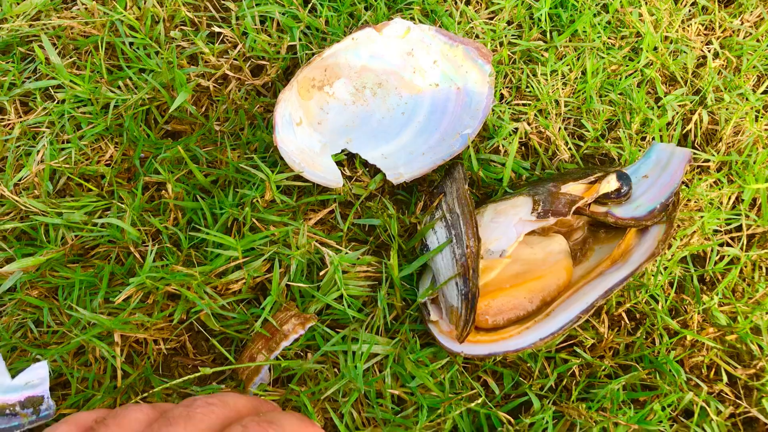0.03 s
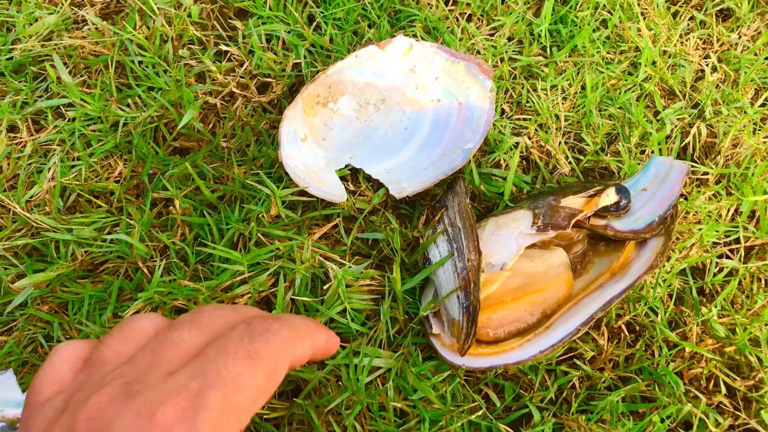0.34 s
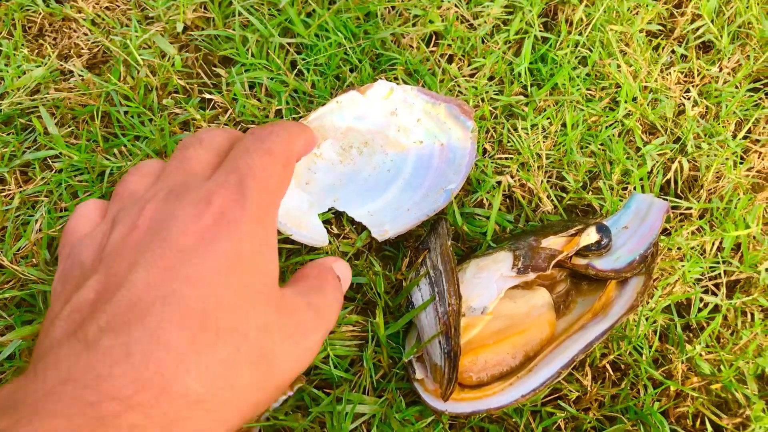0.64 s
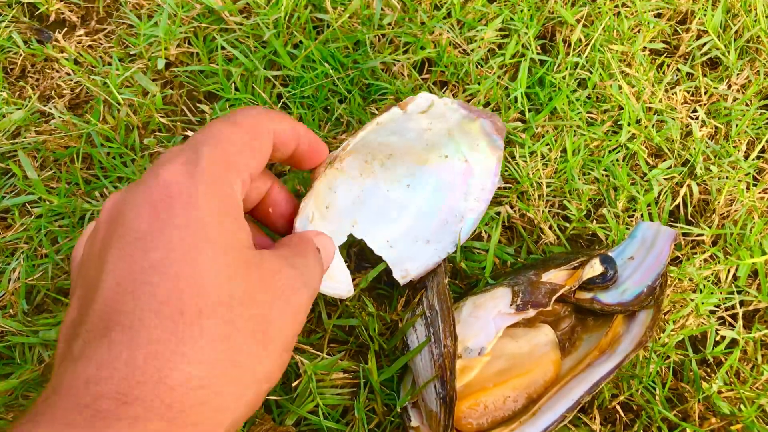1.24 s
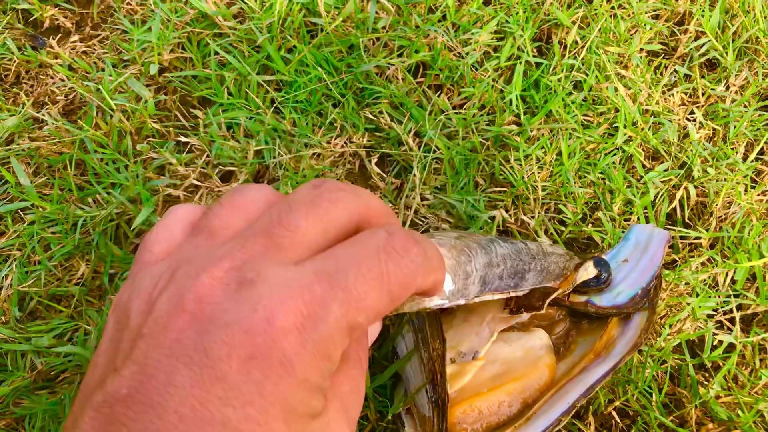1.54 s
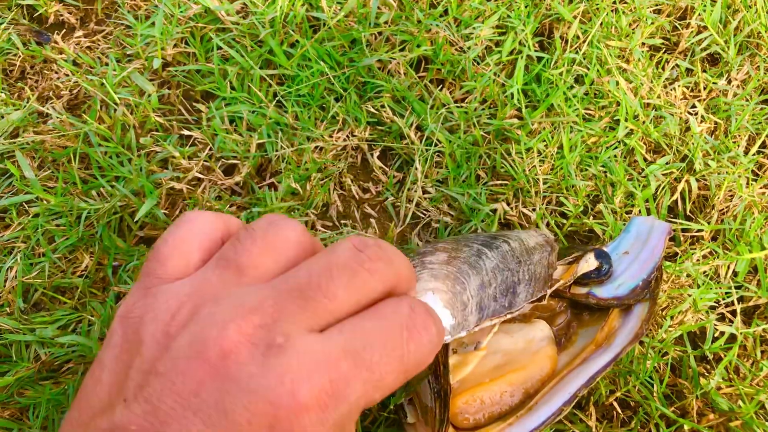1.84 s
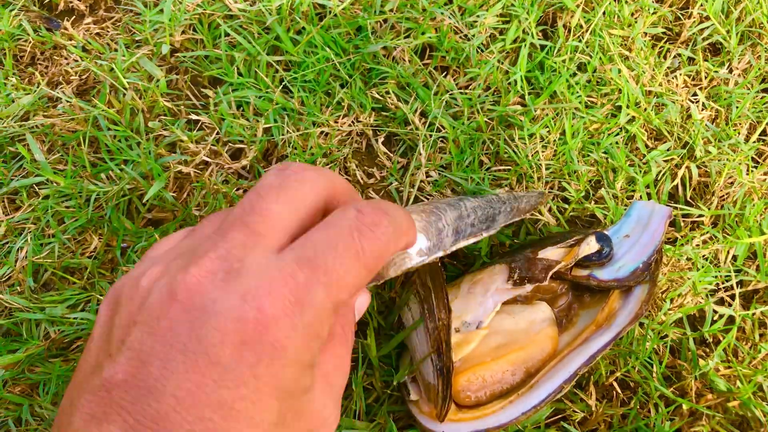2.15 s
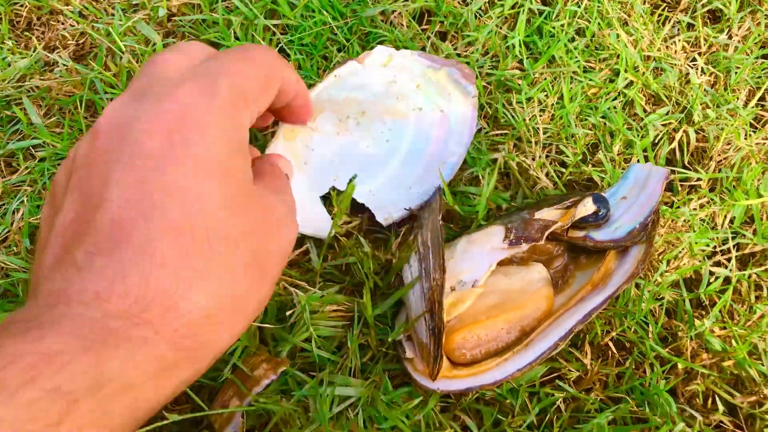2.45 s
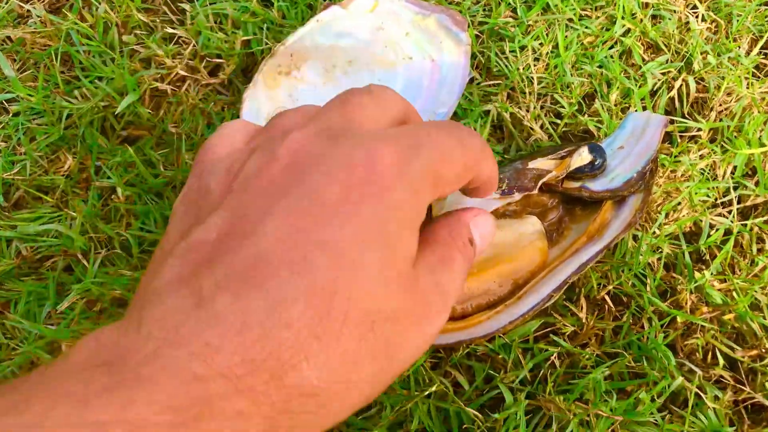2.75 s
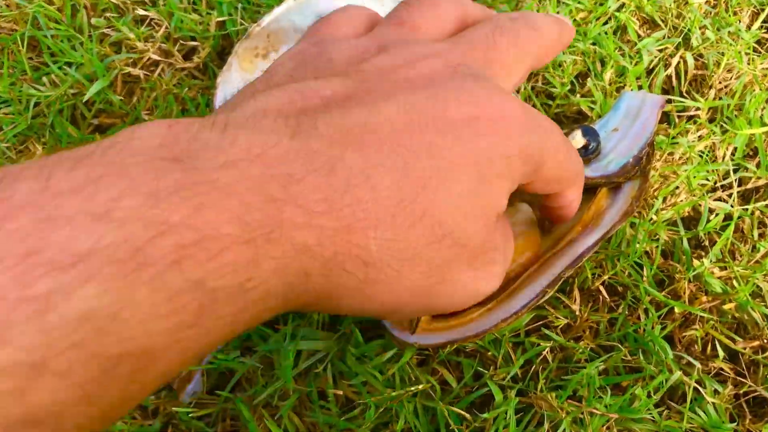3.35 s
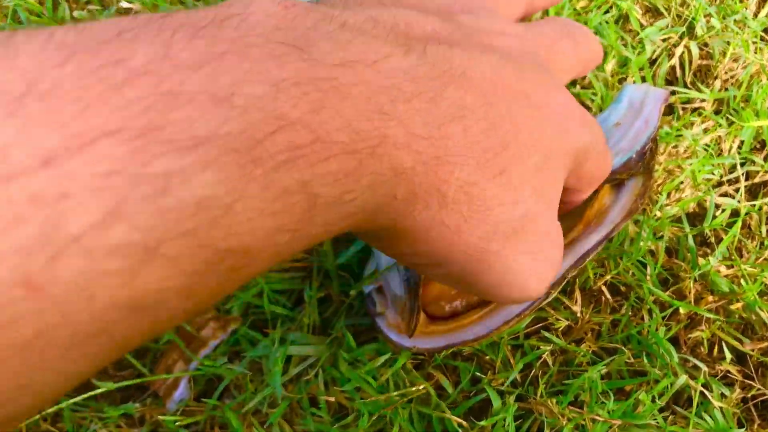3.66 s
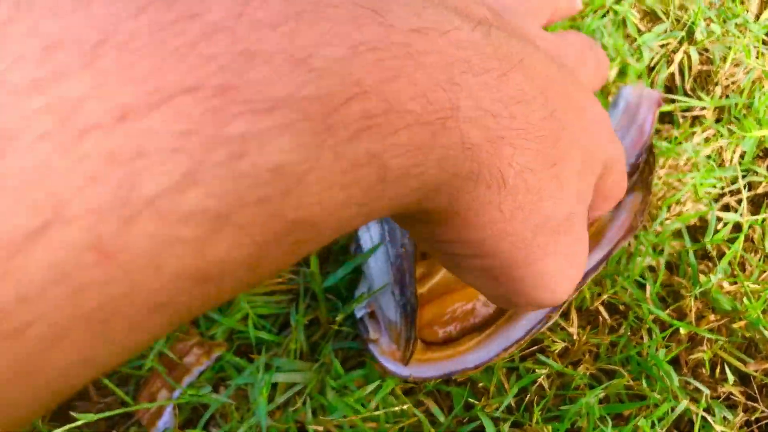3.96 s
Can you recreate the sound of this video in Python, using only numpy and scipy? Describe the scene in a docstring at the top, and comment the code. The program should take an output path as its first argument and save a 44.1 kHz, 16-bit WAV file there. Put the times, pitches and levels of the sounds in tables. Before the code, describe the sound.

A thin mussel shell clicks and scrapes against other shells close by as grass rustles and ticks around it. The handling builds midway, then thins out. Outdoors, a distant engine idles and an insect chirps faintly.

```python
"""Outdoors in the grass, a hand lifts a large mussel shell, tips it against other shells, lays it back
and touches the next one. Each contact rings the thin shell: it clicks, scrapes and squeaks once,
while grass blades brush it and snap past its rim. Some way off an engine idles, every firing a low
exhaust puff and a light knock. An insect chirps faintly over the rumble and hiss of open air."""
import sys
import numpy as np
from scipy import signal
from scipy.fft import rfft, irfft
from scipy.io import wavfile

SR = 44100
rng = np.random.default_rng(int(sys.argv[2]) if len(sys.argv) > 2 else 0)


def waveform_to_disk(signal):
    """Save audio, clipped to [-1, 1], as 16-bit WAV at the path in sys.argv[1]."""
    frames = np.transpose(np.atleast_2d(signal))
    scaled = np.clip(frames, -1, 1) * 32767
    samples = np.round(scaled).astype(np.int16)
    wavfile.write(sys.argv[1], SR, samples)


N = 176400


def amp(db):
    """Decibels to gain."""
    return 10 ** (np.asarray(db) / 20)

def unit(x):
    """Scales to rms 1."""
    return x / np.sqrt(np.mean(x ** 2) + 1e-20)

def curve(points):
    """Joins (seconds, value) points over the whole scene."""
    return np.interp(np.arange(N) / SR, *np.transpose(points))

def drift(hz):
    """Random wander of rms 1, no faster than the given rate."""
    return unit(irfft(rfft(rng.standard_normal(N)) * (np.fft.rfftfreq(N, 1 / SR) < hz), N))

def sine(hz):
    """A sine that follows a moving pitch."""
    return np.sin(2 * np.pi * np.cumsum(hz) / SR)

def add(mix, start_s, sound):
    """Mixes a sound in at a time."""
    part = mix[max(round(start_s * SR), 0):][:len(sound)]
    part += sound[:len(part)]

def colour(x, points, size=8192):
    """A minimum-phase EQ of unit energy, shaped by (Hz, dB) points."""
    point_hz, point_db = np.transpose(points)
    hz = abs(np.fft.fftfreq(size, 1 / SR))
    db = np.interp(np.log(hz + 1), np.log(point_hz + 1), point_db)
    response = np.exp(np.conj(signal.hilbert(np.log(amp(db)))))
    taps = np.fft.ifft(response).real[:size // 2]
    return signal.oaconvolve(x, taps / np.linalg.norm(taps))[:len(x)]

def bump(centre_hz, octaves, skirt_db):
    """EQ points for a broad peak over a flat skirt."""
    hz = np.geomspace(100, 20000, 24)
    peak = np.exp(-.5 * (np.log2(hz / centre_hz) / octaves) ** 2)
    return np.c_[hz, 20 * np.log10(peak + amp(skirt_db))]


# The ring of the mussel shell. Each row: pitch in Hz, level in dB, seconds to die away by 60 dB.
SHELL_MODES = [(690, 3, .02), (930, 0, .015), (1230, -4, .03), (1720, -1.5, .04), (1890, -2.5, .045),
               (2350, -4, .016), (2680, 1.5, .025), (3380, -2, .025), (3930, 6, .018), (4400, 3, .009),
               (5450, 2, .015), (7160, -1, .025), (9150, -1, .02), (11300, -1, .015)]

def shell(contact, ring_db):
    """A contact plus the short ring that it excites in the thin shell."""
    t = np.arange(3000) / SR
    ring = sum(amp(db - 60 * t / t60) * np.cos(2 * np.pi * hz * t) for hz, db, t60 in SHELL_MODES)
    rung = signal.oaconvolve(contact, ring / np.linalg.norm(ring))[:len(contact)]
    return (contact + amp(ring_db) * rung) / np.hypot(1, amp(ring_db))


# Shell against shell. Each row: start in seconds, level in dB, EQ centre in Hz, grit decay in seconds.
CLACKS = [(1.630, -44, 3100, 0.0026), (1.6305, -46.5, 910, 0.0023), (1.638, -45, 3870, 0.0028),
          (1.678, -54, 3670, 0.012), (1.900, -40.5, 2320, 0.0014), (2.146, -44.5, 1800, 0.0033),
          (2.168, -50.5, 1780, 0.0048), (2.3927, -33, 4440, 0.0011), (2.393, -37, 1700, 0.0014),
          (2.394, -44.5, 770, 0.0017), (2.397, -34, 3470, 0.0016), (2.451, -45.5, 1850, 0.003),
          (3.276, -50, 1900, 0.0034), (3.296, -51.5, 3600, 0.004)]

def clacks(strike_db=16):
    """A hard strike and a few milliseconds of grit ring the shell."""
    out, t = np.zeros(N), np.arange(4096) / SR
    strike = amp(strike_db) * (t == 0)
    for start, db, centre_hz, decay_s in CLACKS:
        grit = np.exp(-t / decay_s) * rng.standard_normal(len(t))
        contact = colour(grit + strike, bump(centre_hz, octaves=.36, skirt_db=-14))
        add(out, start, amp(db) * unit(shell(contact, ring_db=6)) * grit.std())
    return out


def grains(per_second=4000, spread_db=4):
    """Friction as dense, tiny slips of very unequal size."""
    size = amp(spread_db * np.minimum(rng.exponential(1, N), 5))
    return unit(size * rng.choice([-1, 1], N) * (rng.random(N) < per_second / SR))

def blades(x, spacing_hz=400, ripple_db=4.2):
    """Each tuft of grass has its own random set of resonances."""
    hz = np.linspace(0, 100 * spacing_hz, 100)
    return colour(x, np.c_[hz, ripple_db * rng.standard_normal(len(hz))], size=1024)

def brushing(size=2048):
    """Grass rubs on shell; new blades take over every few hundredths of a second."""
    out, slips = np.zeros(N), np.pad(grains(), (0, size))
    window = np.sin(np.pi * np.arange(size) / size)
    for i in range(0, N, size // 2):
        add(out, i / SR, blades(slips[i:i + size] * window))
    return unit(out)


# The shell's slides. Each row: start in seconds, length in seconds, peak position from 0 to 1,
# grass level in dB, rim level in dB.
STROKES = [(0.734, 0.19, 0.13, -59, -73), (0.97, 0.34, 0.36, -64.5, -75.5), (1.183, 0.17, 0.37, -56, -77),
           (1.392, 0.027, 0.45, -57.5, -64), (1.501, 0.21, 0.91, -55.5, -67), (1.675, 0.02, 0.3, -59, -67),
           (1.78, 0.24, 0.09, -60, -74.5), (2.115, 0.12, 0.51, -52, -66.5), (2.193, 0.19, 0.66, -56.5, -80),
           (2.336, 0.097, 0.5, -49, -65.5), (2.425, 0.072, 0.4, -50.5, -62), (2.484, 0.15, 0.34, -58, -77),
           (3.241, 0.07, 0.95, -68, -58), (3.79, 0.16, 0.27, -67, -77.5), (3.908, 0.078, 1, -67, -72)]
# The crisp top end of the grass. Each row: frequency in Hz, relative level in dB.
RUSTLE_EQ = [(200, -24), (800, -32), (2000, -13), (4500, 3.5), (6500, 5.5), (9500, 6.5), (13000, 9),
             (16000, 10.5)]
# The midrange rasp of the rim. Each row: frequency in Hz, relative level in dB.
SCRAPE_EQ = [(150, -27), (600, 5.5), (1300, 8.5), (1800, 9), (3500, 14.5), (5000, 0.5), (8000, -13)]

def sliding():
    """Each stroke swells and fades, catching unevenly: grass brushes the shell and its rim scrapes."""
    grass_gain, rim_gain = np.zeros(N), np.zeros(N)
    for start, length, peak, grass_db, rim_db in STROKES:
        progress = np.arange(0, length, 1 / SR) / length
        push = np.interp(progress, [0, np.clip(peak, .05, .95), 1], [0, 1, 0])
        add(grass_gain, start, amp(grass_db) * push)
        add(rim_gain, start, amp(rim_db) * push)
    catch = amp(2 * drift(hz=97))
    rustle = colour(brushing() * grass_gain * catch, RUSTLE_EQ)
    scrape = colour(grains() * rim_gain * catch, SCRAPE_EQ)
    return shell(rustle, ring_db=-5) + shell(scrape, ring_db=-3)


# Pitched rubs on the shell. Each row: start in seconds, length in seconds, pitch in Hz, level in dB.
DRAGS = [(.745, .15, 2140, -74.5), (0.743, .15, 2420, -69), (0.749, .15, 5720, -71),
         (.75, 0.12, 7000, -67.5), (1.024, 0.13, 5750, -68.5), (1.197, 0.12, 2290, -67.5),
         (1.207, 0.073, 6460, -65), (1.23, .1, 9070, -64.5), (1.623, 0.08, 3940, -67.5),
         (2.143, 0.043, 1830, -55.5), (2.439, 0.043, 7160, -59)]

def drags(width_hz=90):
    """A dragging finger or rim sticks and slips, sounding the one resonance that the grip leaves free."""
    out = np.zeros(N)
    for start, length, hz, db in DRAGS:
        progress = np.arange(0, length, 1 / SR) / length
        friction = rng.standard_normal(len(progress))
        rung = signal.lfilter(*signal.iirpeak(hz, hz / width_hz, SR), friction)
        add(out, start, amp(db) * unit(rung) * np.sqrt(np.sin(np.pi * progress)))
    return out


# The partials of the squeak. Each row: pitch in Hz, level in dB.
SQUEAK_PARTIALS = [(9950, -42.5), (11900, -48), (14300, -45.5)]

def squeak(peak_s=1.7483, width_s=.0023, wobble_hz=130):
    """The rim gives one very short, high stick-slip squeak."""
    swell = np.exp(-.5 * ((np.arange(N) / SR - peak_s) / width_s) ** 2)
    return swell * sum(amp(db) * sine(hz + wobble_hz * drift(hz=790)) for hz, db in SQUEAK_PARTIALS)


# Bright ticks of grass. Each row: start in seconds, level in dB, width of the swell in seconds.
SNAPS = [(0.789, -48, 0.0015), (.801, -59, 0.002), (1.025, -55.5, 0.00095), (1.068, -55.5, 0.00093),
         (1.172, -53, .0006), (1.277, -49, 0.0016), (1.581, -41.5, 0.00053), (1.604, -46, .0008),
         (1.638, -44.5, 0.0018), (1.676, -50, .004), (1.745, -43, .0027), (1.815, -55.5, 0.0024),
         (1.863, -56, 0.00084), (1.88, -48, 0.00075), (2.019, -57.5, 0.00074), (2.143, -50, 0.00055),
         (2.349, -46.5, 0.0026), (2.398, -44, 0.00055), (2.434, -47, .00091)]

def grass_snaps():
    """A dry blade catches on the rim and flicks free in a puff of bright noise."""
    out, t = np.zeros(N), np.arange(4096) / SR
    bright = bump(centre_hz=11300, octaves=.62, skirt_db=-9)
    for start, db, width_s in SNAPS:
        swell = np.exp(-.5 * (t / width_s - 1.5) ** 2)
        flick = colour(rng.standard_normal(len(t)) * swell, bright, size=1024)
        swell_rms = np.sqrt(np.mean(swell ** 2))
        add(out, start, amp(db) * unit(blades(flick)) * swell_rms)
    return out


# The ring of the engine block. Each row: pitch in Hz, gain in dB before weighting by ring time,
# seconds to die away by 60 dB.
BLOCK_MODES = [(1720, 5, 0.019), (1876, -2.5, 0.013), (2580, -16.5, 0.029), (3360, 6, 0.0047),
               (3690, -6, 0.031), (4115, -3, 0.057)]

def engine_block(knocks, sway_db=3.5):
    """The block rings as loud as the knocks that drive it; its modes stand out by turns."""
    ring = np.zeros(N)
    for hz, db, t60 in BLOCK_MODES:
        q = hz * t60 * np.pi / np.log(1000)
        mode = signal.lfilter(*signal.iirpeak(hz, q, SR), knocks)
        ring += amp(db + sway_db * drift(hz=12)) * t60 * mode
    return unit(unit(knocks) + unit(ring))


# The idle speed, sagging slightly midway. Each row: time in seconds, firings per second.
FIRING_RATE = [(0, 27.55), (1.4, 27.53), (1.72, 26.75), (2.6, 27.33), (4, 27.38)]
# The body of the exhaust. Each row: multiple of the mean firing rate, relative level in dB.
EXHAUST_EQ = [(1, -29), (2, -8.5), (3, -1), (4, -1), (5, -11), (6, -8), (7, -7), (8, -17.5), (10, -18.5),
              (14, -28.5), (22, -30), (40, -54)]
# The metallic colour of the knock. Each row: frequency in Hz, relative level in dB.
KNOCK_EQ = [(200, 3.5), (500, -10.5), (1000, 1.5), (1450, -7), (1750, -3.5), (2250, -3.5), (3450, 1),
            (4150, -7), (4750, -9), (8000, -24), (16000, -38)]
# Fader rides for the deepest engine tone, the knock and the hum. Each row: time in seconds, level in dB.
BOOM_FADER = [(0, -54.5), (1.3, -54), (1.65, -56), (2.0, -49.5), (2.3, -48), (2.6, -54.5), (3.1, -58.5),
              (4, -57)]
KNOCK_FADER = [(0, -67), (.43, -66), (1, -68), (2.1, -68), (3.2, -66.5), (3.6, -68)]
HUM_FADER = [(0, -65.5), (1.1, -63), (1.4, -56), (1.8, -57.5), (2.0, -58.5), (2.7, -61.5), (4, -58.5)]

def engine(first_firing_s=.0265, puff_lag_s=.002, knock_lag_s=.0028, knock_width_s=.0025, hum_hz=162.7):
    """Every firing gives a low exhaust puff and a short metallic knock; a hum runs beside them."""
    rate = curve(FIRING_RATE)
    cycles = np.cumsum(rate) / SR - first_firing_s * rate[0]
    firing_times = np.flatnonzero(np.diff(np.floor(cycles))) / SR
    puffs, knock_gain, t = np.zeros(N), np.zeros(N), np.arange(SR // 20) / SR
    swell = np.exp(-.5 * ((t - t.mean() - knock_lag_s) / knock_width_s) ** 2)
    for firing in firing_times:
        puff_db, knock_db = rng.normal(0, [1, 1.8])  # no two firings are equally strong
        add(puffs, firing + puff_lag_s, amp([puff_db]))
        add(knock_gain, firing - t.mean(), amp(knock_db) * swell)
    exhaust_eq = [(order * rate.mean(), db) for order, db in EXHAUST_EQ]
    exhaust = unit(colour(puffs - puffs.mean(), exhaust_eq))
    deep = signal.sosfiltfilt(signal.butter(2, [44, 66], "band", fs=SR, output="sos"), exhaust)
    throb = amp(-55) * unit(exhaust - deep)
    boom = amp(curve(BOOM_FADER)) * unit(deep)
    clatter = (knock_gain + .21) * rng.standard_normal(N)  # a bed of noise stays between knocks
    knock = amp(curve(KNOCK_FADER)) * engine_block(colour(clatter, KNOCK_EQ))
    hum = amp(curve(HUM_FADER)) * np.sqrt(2) * sine(hum_hz + 2.047 * drift(hz=5.5))
    return throb + boom + knock + hum


# The insect's cues. Each entry: start of a chirp in seconds.
CHIRP_STARTS = [.397, .505, .627, .849, 1.49, 2.565, 2.674, 2.782, 3.378, 3.585, 3.687, 3.797]

def insect(pitch_hz=7130, fall_hz=154, syllable_s=.0086, spacing_s=.012, level_db=-70.5):
    """Each chirp is three short, slightly falling syllables."""
    out, progress = np.zeros(N), np.arange(0, 1, 1 / (syllable_s * SR))
    swell = amp(level_db) * np.sin(np.pi * progress)
    for start in CHIRP_STARTS:
        for syllable in range(3):
            hz = pitch_hz + 70 * rng.standard_normal() + fall_hz * (.5 - progress)
            add(out, start + syllable * spacing_s, swell * sine(hz))
    return out


def faint_tone(start_s=2.12, length_s=.24, pitch_hz=394, level_db=-63):
    """A faint low tone comes and goes."""
    progress = np.clip((np.arange(N) / SR - start_s) / length_s, 0, 1)
    return amp(level_db) * np.sin(np.pi * progress) * sine(pitch_hz + 2 * drift(hz=22))


# The two layers of the outdoor bed. Each row: frequency in Hz, relative level in dB.
RUMBLE_EQ = [(20, -41), (36, -5), (60, -2.5), (120, 2), (180, -1), (280, -8.5), (450, -18), (800, -28.5),
             (2000, -62.5)]
HISS_EQ = [(240, -28.5), (400, 1.5), (636, -5), (879, -2.5), (1510, -10.5), (1760, -8), (2250, -9.5),
           (3420, -8), (4800, -16), (5690, -14), (10500, -22.5), (12100, -20), (16000, -23.5)]

def open_air(rumble_db=-56, hiss_db=-66):
    """Low rumble and a soft hiss, each wavering a little in level."""
    rumble = colour(rng.standard_normal(N), RUMBLE_EQ) * amp(rumble_db + drift(hz=4.6))
    hiss = colour(rng.standard_normal(N), HISS_EQ) * amp(hiss_db + .5 * drift(hz=2.3))
    return rumble + hiss


def scene():
    """Shell and grass close by, everything else far off, in mono."""
    close = clacks() + grass_snaps() + squeak() + sliding() + drags()
    far = engine() + insect() + faint_tone() + open_air()
    return (close + far)[None]

def record(dry, silence_s=.083, cutoff_hz=15950):
    """The sound cuts in after a moment of silence; a steep low-pass trims the very top."""
    gate = np.arange(N) / SR >= silence_s
    lowpass = signal.firwin(511, cutoff_hz, window=("kaiser", 9), fs=SR)
    return signal.oaconvolve(dry * gate, lowpass[None], "same")


dry = scene()
out = record(dry)
waveform_to_disk(out)
```